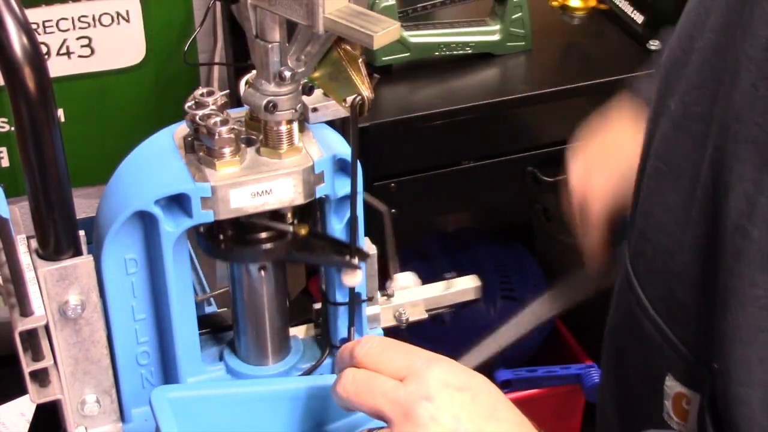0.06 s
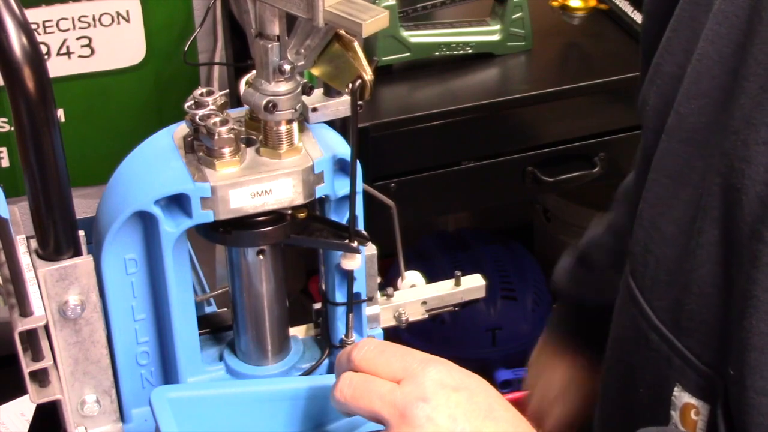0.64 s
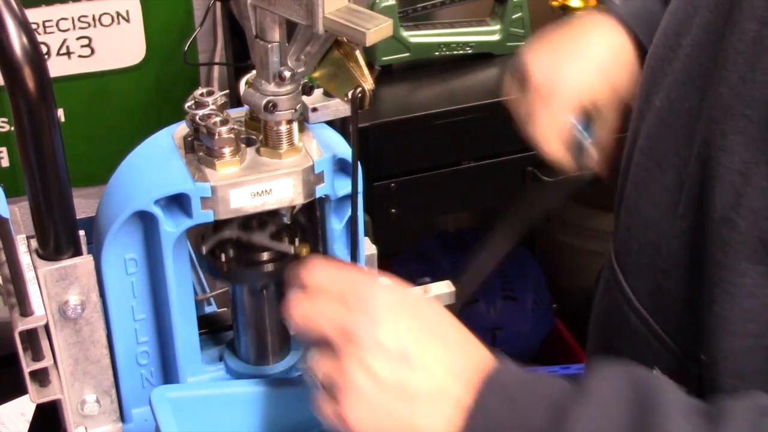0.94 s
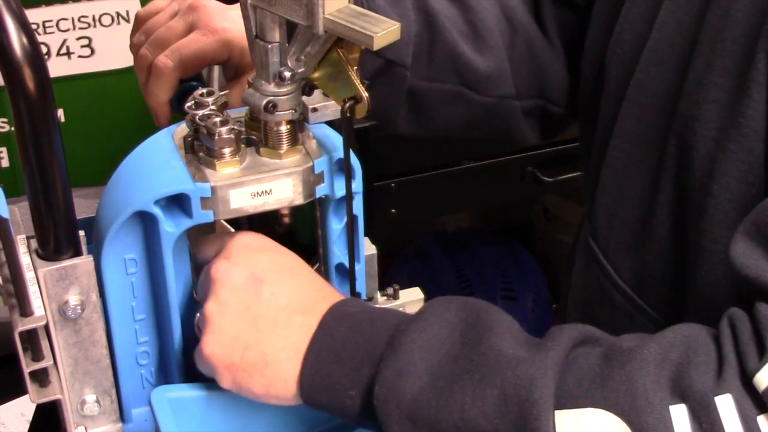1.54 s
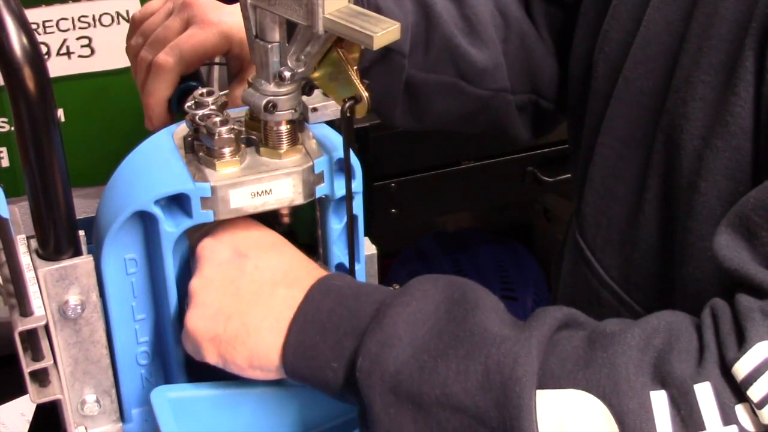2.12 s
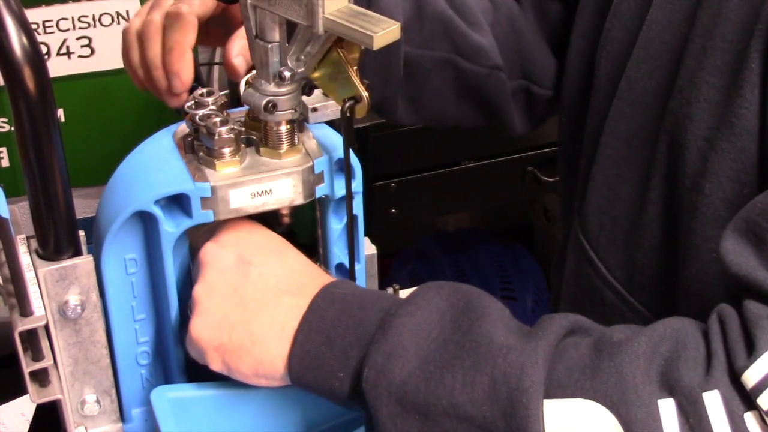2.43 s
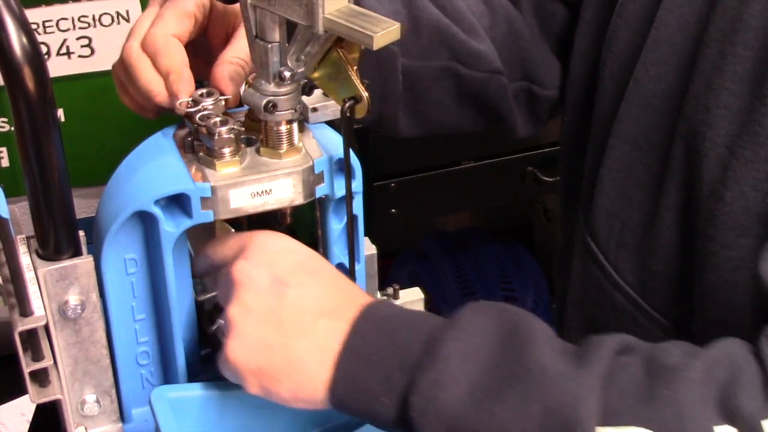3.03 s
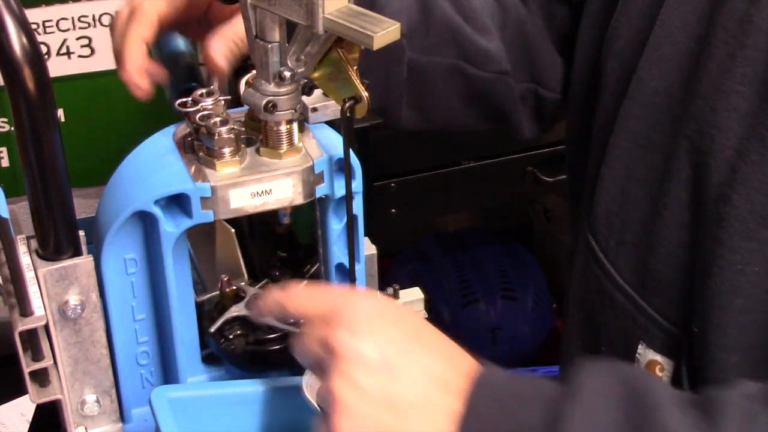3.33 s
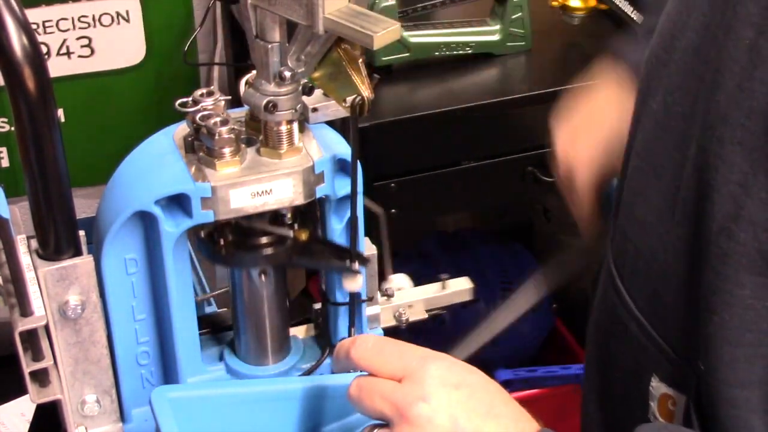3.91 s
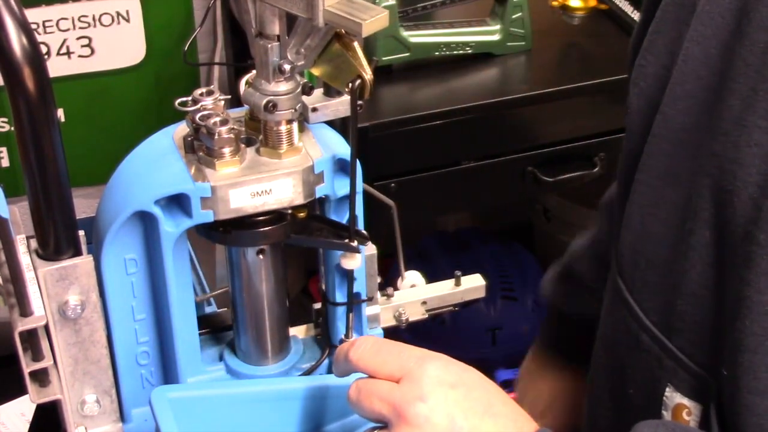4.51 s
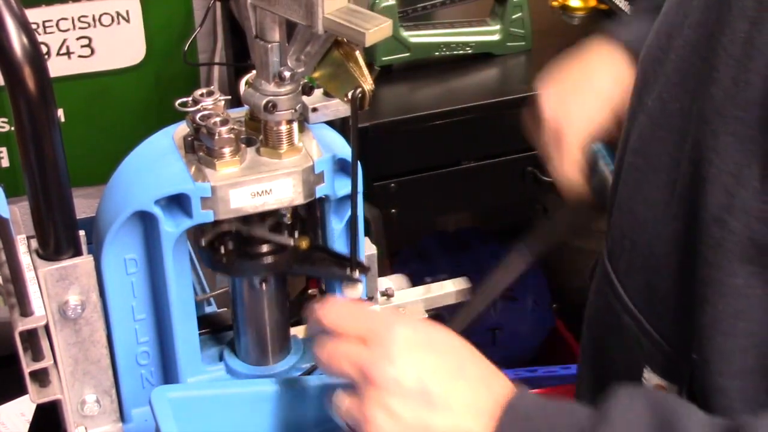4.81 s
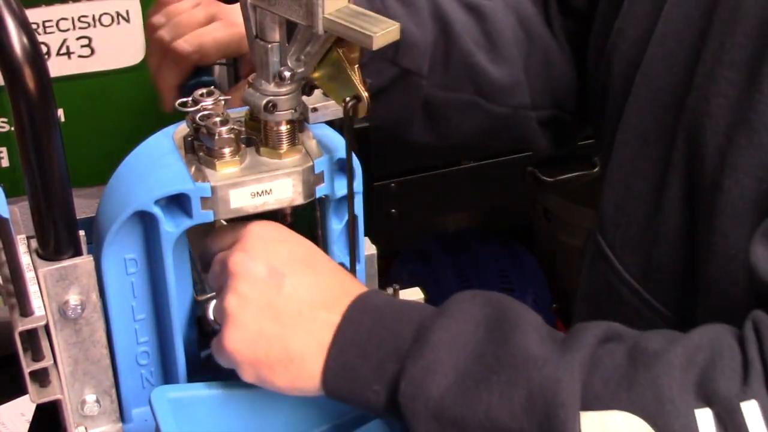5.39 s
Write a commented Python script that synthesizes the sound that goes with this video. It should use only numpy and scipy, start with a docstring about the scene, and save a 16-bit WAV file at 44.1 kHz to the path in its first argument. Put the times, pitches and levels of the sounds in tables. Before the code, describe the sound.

A manual reloading press is worked through two strokes on a workshop bench. Each begins with a brief judder and sharp metal clanks, then sliding scrapes and a quick run of clicks, clacks and chinking brass cases. Between the strokes comes a lull with faint pivot groans and a few light ticks. The sound is close and nearly centered, in a small quiet room with a short echo.

```python
"""Hand-worked reloading press, two strokes on a workshop bench, heard close.
Linkage and pawls knock and chatter; each blow rings the cast frame and thumps the bench.
A fitting judders; brass cases ping, chink and rattle. Sliding metal scrapes and squeals,
and a pivot groans softly by stick-slip. Small, quiet room with a short echo."""
import sys
import numpy as np
from scipy import signal
from scipy.fft import rfft, irfft
from scipy.io import wavfile
from scipy.ndimage import uniform_filter1d

SR = 44100
rng = np.random.default_rng(int(sys.argv[2]) if len(sys.argv) > 2 else 0)


def wrap_up_sound(samples):
    """Save the sound to the file named by the first command line argument, as 16-bit audio."""
    columns = np.atleast_2d(samples).T
    # keep every value between -1 and 1, then stretch to whole-number steps
    tamed = np.clip(columns, -1, 1)
    steps = np.round(tamed * 32767).astype(np.int16)
    wavfile.write(sys.argv[1], SR, steps)


N = 244755
RING_SAMPLES = 12288
TIME_S, AGE_S = np.arange(N) / SR, np.arange(RING_SAMPLES) / SR
FRAME_T60_S, STEEL_T60_S, PAWL_T60_S = .15, .18, .091

# Contact kinds (thump trim [dB], body trim [dB], tick trim [dB], chatter decay [s], pawl ring [dB])
THUD = (9, 6, -17, .0083, -24)  # handle at end of travel
BUMP = (5, 3, -7, .0086, -20)  # linkage slack taken up
CLANK = (-5, -1, -11, .009, -19)  # steel on frame
CLUNK = (-6, 7, -13.5, .007, -21)  # heavy part shifts
CLINK = (-18, -3.5, -8.5, .01, -13)  # case on die or guide
CLACK = (-21, -9, -8.5, .0052, -8)  # lever snaps over
TRIP = (-18, -7, -13.5, .0075, -1)  # pawl trips
DRAG = (-18, -6.5, -9, .0114, -12.5)  # lever scrapes over cam
TAP = (-17, -7.5, -16, .0088, -10)  # small part lands
TICK = (-21, -3, 1.5, .0065, -20)  # light, hard touch
NUDGE = (-4, 3.5, -24, .0069, -20)  # loaded linkage gives
# Contacts of both strokes: ram tops out, breaks free, levers trip, plate turns
# (time 1 [s], time 2 [s], level 1 [dB], level 2 [dB], part pitch [Hz], kind)
STROKE_CONTACTS = [ (0.1519, 4.0484, -12, -14, 1963, CLANK), (0.2197, 4.1031, -17.5, -15.5, 2000, CLANK),
                   (0.271, 4.1605, -36.5, -35, 1600, BUMP), (0.4057, 4.276, -27.5, -25, 2330, THUD),
                   (0.4368, 4.3048, -27, -30.5, 1680, BUMP), (0.6859, 4.5776, -29, -28, 1420, THUD),
                   (.7376, 4.6369, -27, -27.5, 2200, BUMP), (.758, 4.657, -28.5, -29, 2680, CLINK),
                   (0.7655, 4.6635, -20, -20, 1450, CLUNK), (0.8035, 4.7038, -18.5, -18.5, 1730, CLACK),
                   (.843, 4.747, -31, -31.5, 3700, TAP), (0.8745, 4.778, -31, -30.5, 3120, CLACK),
                   (.913, 4.817, -28.5, -27, 1040, DRAG), (.922, 4.8254, -23, -24, 1380, CLINK),
                   (.939, 4.843, -27.5, -28, 2630, DRAG), (0.9462, 4.8524, -19.5, -20, 2580, TRIP),
                   (1.0062, 4.9161, -26, -27, 2030, DRAG), (1.054, 4.9676, -25, -25.5, 3080, DRAG),
                   (1.065, 4.981, -14.5, -15.5, 1460, TRIP), (1.2719, 5.1973, -32, -31.5, 1650, CLUNK),
                   (1.3396, 5.2757, -29.5, -29, 5500, TICK), (1.3535, 5.2954, -27, -28.5, 3100, TAP),
                   (1.474, 5.4305, -36, -36, 1410, THUD), (1.5033, 5.4726, -40, -39.5, 1515, THUD)]
# One-off contacts: cases and linkage shift, hand sets a part (time [s], level [dB], pitch [Hz], kind)
STRAY_CONTACTS = [ (0.0124, -35.5, 4670, TICK), (0.0538, -25, 1860, CLACK), (0.614, -35.5, 1950, NUDGE),
                  (1.1651, -22.5, 3170, TAP), (1.3733, -28.5, 1574, TAP), (5.118, -35, 3400, DRAG),
                  (4.341, -34, 856, NUDGE), (4.3637, -37, 1470, DRAG), (4.417, -39, 942, NUDGE),
                  (4.5, -35, 1040, NUDGE), (4.533, -40.5, 1020, NUDGE), (4.564, -40, 2400, DRAG),
                  (2.1219, -35, 1030, CLINK), (2.17, -45.5, 3570, DRAG), (2.452, -39, 5970, TICK),
                  (2.6614, -41, 3050, TAP), (3.5424, -19, 3120, CLACK), (3.6002, -35.5, 3440, TICK),
                  (3.6935, -28.5, 1760, CLINK), (3.74, -33, 4340, TICK), (3.7493, -26.5, 2000, DRAG),
                  (3.77, -25, 2580, DRAG), (3.8002, -24, 1940, CLINK), (3.861, -38.5, 1840, TICK),
                  (3.913, -36.5, 4900, TICK), (3.959, -32.5, 1700, CLINK)]
# Cast frame on its bench (frequency [Hz], level [dB])
FRAME_MODES = [(146, -41.5), (212, -42), (340, -38.5), (378, -42), (455, -44.5), (506, -41), (662, -47),
               (790, -48.5), (870, -44.5), (1028, -43), (1130, -47), (1470, -47), (1690, -52),
               (1845, -46.5), (1981, -48.5)]
# Steel ram and dies (frequency [Hz], level [dB])
STEEL_MODES = [(2385, -36), (5141, -42.5), (10450, -57)]
# Indexing pawl and lever (frequency [Hz], level [dB])
PAWL_MODES = [(867, -4), (1690, -2), (1775, -0.5), (2570, -1), (2720, -3.5), (3070, -3), (4050, -6),
              (8700, -14)]
# Dense, short ring between the modes (frequency [Hz], density [dB])
CRACK_SPECTRUM = [(53, -60.5), (95, -28), (139, -4), (210, -3), (260, -18.5), (338, -0.5), (544, -10),
                  (1040, -7.5), (1270, -11.5), (2380, -12), (3290, -16), (10400, -27), (12500, -45),
                  (16000, -60)]
# Fitting judders near the top of each stroke (time [s], level [dB])
JUDDERS = [(0.1058, -25), (4.005, -25)]
# Fitting resonances (frequency [Hz], base width [Hz], level [dB])
FITTING_MODES = [(1910, 47, -6.5), (2420, 57, 1), (2940, 46, -2.5), (3320, 70, -8.5), (4290, 60, -10),
                 (5240, 76, -7), (5660, 70, -5), (7760, 69, -13), (8300, 63, -12), (11560, 50, -22),
                 (14550, 35, -24)]
# Small brass part struck (time [s], knock [dB], ping [dB])
PINGS = [(0.554, -32, -46), (3.456, -26, -32.5), (3.484, -30.5, -52), (4.448, -38, -62)]
# Its knock (frequency [Hz], density [dB])
KNOCK_SPECTRUM = [(71, -34), (120, -20), (260, -12.5), (484, 5), (682, -19.5), (1150, -13.5), (1630, -7),
                  (1760, -16.5), (5140, -10.5), (9430, -25.5), (11100, -36), (15000, -112)]
# Brass case against its guide (time [s], level [dB], pitch [Hz])
CHINKS = [(0.0121, -36.5, 13000), (.06, -40, 13500), (.152, -32, 14600), (.7422, -34.5, 8900),
          (.751, -41, 10000), (0.8028, -30, 10350), (0.8744, -43, 10400), (0.922, -36, 6750),
          (1.047, -42, 14400), (1.0598, -30.5, 10430), (1.066, -38, 14800), (1.1283, -43, 8000),
          (1.1403, -43, 10500), (1.185, -39, 8200), (1.2007, -40, 12800), (1.26, -37, 10500),
          (2.122, -46, 5200), (2.205, -51, 5600), (2.452, -45, 5910), (3.5422, -24, 5210),
          (3.5697, -39, 7660), (3.639, -37, 7400), (3.6929, -39, 10500), (3.762, -36.5, 8300),
          (3.9137, -36, 12900), (3.915, -35.5, 4600), (3.958, -41, 4630), (4.166, -43.5, 7700),
          (4.3656, -43.5, 7900), (4.6425, -33.5, 9320), (4.7035, -31.5, 10240), (4.7784, -46, 10400),
          (4.961, -44, 14400), (4.972, -29, 10450), (4.981, -40, 14800), (5.0433, -46, 11000),
          (5.07, -41.5, 10360), (5.1027, -40, 8000), (5.123, -36, 11000), (5.186, -38, 10320)]
# Dry metal squeals (time [s], length [s], level [dB], start pitch [Hz], end pitch [Hz], width [Hz])
SQUEALS = [(0.049, 0.023, -27.5, 2500, 3810, 600), (3.597, 0.054, -38, 4300, 5980, 1800),
           (3.745, .04, -32, 3800, 2590, 1500)]
# Ram and linkage travel, one list per stroke (time [s], rub [dB], scrape [dB])
SLIDE_CURVES = [
    [(0.0, -36.5, -39), (0.366, -43, -53), (0.68, -37.5, -47), (0.86, -37.5, -42.5), (1.108, -35.5, -35),
     (1.3, -37.5, -46), (1.45, -46.5, -53.5), (1.8, -67, -70)],
    [(3.5, -41, -51), (3.6, -39, -47), (3.72, -31.5, -37), (3.87, -38.5, -43), (4.1, -34, -39),
     (4.24, -44, -53), (4.55, -43.5, -53.5), (4.9, -37.5, -40), (5.08, -33.5, -37.5), (5.25, -41.5, -50.5),
     (5.55, -52.5, -61)],
]
# Sliding friction (frequency [Hz], density [dB])
RUB_SPECTRUM = [(65, -40), (110, -9.5), (483, 3.5), (1490, -7), (1790, -4.5), (2210, -24), (2670, -13.5),
                (3720, -16), (11000, -33), (16000, -30)]
# Linkage pivot, one list per groan (time [s], pitch [Hz], level [dB])
GROAN_CURVES = [
    [(1.19, 339, -37), (1.25, 490, -37.5), (1.3, 490, -47)],
    [(1.54, 360, -54), (1.602, 410, -46.5), (1.74, 450, -50.5), (1.87, 457, -61)],
    [(2.13, 372.5, -56), (2.18, 343, -52), (2.24, 347, -59)],
]
# Still room (frequency [Hz], density [dB])
AIR_SPECTRUM = [(15, -47), (25, -37), (64, -17.5), (97, -22), (141, -7), (195, -11), (277, -9), (301, -6.5),
                (531, -13), (575, -15), (1290, -19), (1840, -20), (2760, -24), (16000, -40.5)]


def blows(grit_db=5, after_t60_s=.32, part_t60_s=.06):
    """Bursts of tiny contacts ring frame and steel; heavy ones thump the bench, hard ones tick."""
    out = np.zeros(N)
    first = [(s, db, hz, kind) for s, _, db, _, hz, kind in STROKE_CONTACTS]
    second = [(s, db, hz, kind) for _, s, _, db, hz, kind in STROKE_CONTACTS]
    events = first + second + STRAY_CONTACTS
    heaviest_db = max(event[1] for event in events)
    crack = unit(np.pad(response(CRACK_SPECTRUM), (0, RING_SAMPLES))[:RING_SAMPLES])
    bodies = [(modes(FRAME_MODES, FRAME_T60_S), modes(PAWL_MODES, PAWL_T60_S)) for _ in range(10)]
    steel = modes(STEEL_MODES, STEEL_T60_S)
    for k, (at_s, db, hz, kind) in enumerate(events):
        thump_db, body_db, tick_db, chatter_s, pawl_db = kind
        frame, pawl = bodies[k % len(bodies)]
        contacts = noise() * undb(grit_db * noise()) * ragged(depth_db=3, rate_hz=400)
        rise_s = chatter_s ** 2 / .035  # loose blows build more slowly
        rise = (1 - np.exp(-AGE_S / rise_s)) ** 2
        clatter = undb(-16 + .22 * thump_db) * fade(after_t60_s)
        force = contacts * rise * (np.exp(-AGE_S / chatter_s) + clatter)
        steel_db = -9 + 1.6 * (db - heaviest_db)  # only heavy blows set the steel singing
        metal = undb(steel_db) * steel + undb(pawl_db) * pawl + undb(-8) * loose_part(hz, part_t60_s)
        driven = unit(through(force, crack + undb(-7) * frame))
        ring = driven + rise * (undb(-4) * frame + metal)
        snap = unit(band(force * np.exp(-AGE_S / (2 * chatter_s)), 2500, 10500, order=2))
        snap *= undb(-12 + .99 * tick_db)
        bands = [(band(ring, 132, 280, order=4), thump_db - 11.5),
                 (band(ring, 300, 1000), body_db - 9),
                 (band(ring, 1000, 2800), -9),
                 (band(ring, 2800, 5000), -16 - .22 * thump_db),  # heavier thump, softer edge
                 (band(ring + snap, 5000, 16000), tick_db - 9)]
        for part, part_db in bands:
            add(out, at_s - rise_s, undb(db + part_db) * unit_attack(part, .03))
    return out


def loose_part(hz, t60_s, overtone_db=-3):
    """Small struck part: own pitch plus inharmonic overtones that weaken upward."""
    overtones_hz = 1200 * 7 ** rng.random(7)
    levels_db = overtone_db - 20 * np.log10(np.maximum(overtones_hz / hz, 1))
    return modes([(hz, 0), *zip(overtones_hz, levels_db)], t60_s)


def judders(slips=4, gap_s=.0122, step_db=-1, damping=2.2):
    """Stick-slip in a fitting: each slip rings the same resonances and nudges the frame."""
    out = np.zeros(N)
    ring = np.zeros(RING_SAMPLES)
    for k, (hz, width_hz, db) in enumerate(FITTING_MODES):
        decay = np.exp(-np.pi * damping * width_hz * AGE_S)
        ring += (-1) ** k * undb(db) * width_hz * np.cos(2 * np.pi * hz * AGE_S) * decay
    for at_s, db in JUDDERS:
        for k in range(slips):
            force = noise() * fade(t60_s=.06)
            rasp = unit(band(force, 2400, 6000, order=2))
            frame = unit(band(modes(FRAME_MODES, FRAME_T60_S), 150, 800, order=1))
            slip = unit(through(force, ring)) + undb(-14) * rasp + undb(-5) * frame
            add(out, at_s + k * gap_s, undb(db + k * step_db) * unit_attack(slip, gap_s))
    return out


def pings(ping_hz=11080, width_hz=420):
    """A brass part knocks: low frame modes under a tight cluster of high brass modes."""
    out = np.zeros(N)
    for at_s, knock_db, ping_db in PINGS:
        force = noise() * fade(t60_s=.092)
        frame = unit(band(modes(FRAME_MODES, FRAME_T60_S), 290, 560, order=2))
        knock = unit(through(force, response(KNOCK_SPECTRUM))) + frame
        ping = unit(band(noise(), ping_hz - width_hz / 2, ping_hz + width_hz / 2)) * fade(t60_s=.095)
        add(out, at_s, undb(knock_db) * unit_attack(knock, .01) + undb(ping_db) * ping)
    return out


def chinks(gain_db=-2.5, overtone_db=-10):
    """Thin brass cases chatter; held by their guides, they ring only briefly."""
    out = np.zeros(N)
    for at_s, db, hz in CHINKS:
        overtones = [(overtone_hz, overtone_db) for overtone_hz in rng.uniform(3500, 12500, 10)]
        force = noise() * ragged(depth_db=5, rate_hz=500) * fade(t60_s=.055)
        ring = unit(through(force, modes([(hz, 0)] + overtones, t60_s=.034)))
        grit = unit(band(force, hz / 2, min(hz * 1.3, 15800)))
        add(out, at_s, undb(gain_db + db) * unit_attack(ring + undb(-2) * grit, .01))
    return out


def squeals():
    """Dry metal slides: a rough, gliding resonance swells and dies."""
    out = np.zeros(N)
    for at_s, length_s, db, start_hz, end_hz, width_hz in SQUEALS:
        progress = np.clip(AGE_S / length_s, 0, 1)
        phase = 2 * np.pi * np.cumsum(start_hz + (end_hz - start_hz) * progress) / SR
        slips = unit(band(noise(), 9.2, width_hz / 2, order=1))
        tone = slips * np.cos(phase) + slips[::-1] * np.sin(phase)
        swell = np.sqrt(4 * progress * (1 - progress))
        add(out, at_s, undb(db) * tone * swell)
    return out


def sliding(grain_db=8, uneven_db=3, split_hz=1700):
    """Dense metal-on-metal slips in uneven bursts, sounding through the frame."""
    out = np.zeros(N)
    slips = noise(N) * undb(grain_db * noise(N).clip(-3, 3) + uneven_db * walk(60))
    friction = unit(through(slips, response(RUB_SPECTRUM)))
    frame = unit(through(slips, modes(FRAME_MODES, FRAME_T60_S)))
    body = friction + undb(-6) * frame
    low, high = unit(band(body, 140, split_hz, order=2)), unit(band(body, split_hz, 9900))
    for stroke in SLIDE_CURVES:
        times_s, rub_db, scrape_db = np.transpose(stroke)
        moving = uniform_filter1d(1. * ((TIME_S >= times_s[0]) & (TIME_S <= times_s[-1])), size=600)
        rub = low * undb(np.interp(TIME_S, times_s, rub_db) - 2)
        scrape = high * undb(np.interp(TIME_S, times_s, scrape_db) - 4)
        out += moving * (rub + scrape)
    return out


def rattle(ticks_per_s=10, band_ratio=1.3):
    """Loose cases and springs of seven pitches tick on their guides at random as the ram moves."""
    out = np.zeros(N)
    tick = fade(t60_s=.026)[AGE_S < .04]
    for hz in np.geomspace(1500, 10000, 7):
        envelope = np.zeros(N)
        for stroke in SLIDE_CURVES:
            times_s, _, scrape_db = np.transpose(stroke)
            span_s = times_s[-1] - times_s[0]
            for progress, softness in rng.random((int(span_s * ticks_per_s), 2)):
                at_s = times_s[0] + progress * span_s
                offset_db = -2 - 2.5 * np.log(max(softness, .05))
                add(envelope, at_s, undb(np.interp(at_s, times_s, scrape_db) + offset_db) * tick)
        out += envelope * unit(band(noise(N), hz / band_ratio, hz * band_ratio, order=2)) / 2
    return out


def groans(gain_db=-2.5, suboctave_db=-8, flutter_db=2.5, edge_s=.017):
    """Stick-slip in a pivot; alternate slips differ, adding the octave below."""
    out = np.zeros(N)
    for curve in GROAN_CURVES:
        times_s, hz, db = np.transpose(curve)
        level_db = np.interp(TIME_S, times_s, db)
        jitter = np.clip(undb(level_db + 21), .04, .18) * walk(300)  # rougher under load
        phase = 2 * np.pi * np.cumsum(np.interp(TIME_S, times_s, hz) * (1 + jitter)) / SR
        gate = np.clip(np.minimum(TIME_S - times_s[0], times_s[-1] - TIME_S) / edge_s + .5, 0, 1)
        tone = np.sin(phase) + undb(suboctave_db) * np.sin(phase / 2)
        out += np.sqrt(2) * tone * gate * undb(level_db + gain_db + flutter_db * walk(70))
    return out


def bench_sway(press, t60_s=.7):
    """Heavy blows leave the bench rumbling."""
    power = band(press, 130, 300) ** 2
    decay = fade(t60_s) ** 2
    shake = np.sqrt(np.abs(through(power, decay / np.sum(decay))))
    return shake * unit(band(noise(N), 45, 85, order=2))


def room_echo(x, split_hz=1500, build_s=.015):
    """Short diffuse echo of a cluttered room; treble dies first."""
    scatter = noise()
    low = band(scatter, 33, split_hz, order=1) * fade(t60_s=.18)
    high = band(scatter, split_hz, 20000, order=1) * fade(t60_s=.079)
    tail = (low + 1.32 * high) * (1 - np.exp(-AGE_S / build_s))
    return through(x, unit(tail) / np.sqrt(RING_SAMPLES))


def still_room(air_db=-57, tick_db=-54, gap_s=.0664, tick_t60_s=.04):
    """Faint wavering room noise with a tiny regular ticking."""
    air = undb(air_db + .5 * walk(6)) * unit(through(noise(N), response(AIR_SPECTRUM)))
    ring = unit(band(noise(N), 1740, 2020, order=2))
    since_tick_s = (TIME_S - .057) % gap_s
    return air + undb(tick_db) * ring * np.exp(-np.log(1000) * since_tick_s / tick_t60_s)


def modes(table, t60_s):
    """Decaying partials, higher ones dying sooner; weights vary with the point of contact."""
    weights = undb(2 * noise(len(table))) * rng.choice([-1, 1], len(table))
    ring = np.zeros(RING_SAMPLES)
    for weight, (hz, db) in zip(weights, table):
        loss = (hz / table[0][0]) ** .25
        ring += weight * undb(db) * np.sqrt(loss) * np.sin(2 * np.pi * hz * AGE_S) * fade(t60_s / loss)
    return unit(ring)


def ragged(depth_db, rate_hz):
    """Gain of a contact that lands cleanly, then loses and regains touch."""
    knots = np.abs(noise(int(RING_SAMPLES / SR * rate_hz) + 2))
    knots[:2] = 0
    return undb(-depth_db * np.interp(AGE_S * rate_hz, np.arange(len(knots)), knots))


def walk(rate_hz):
    """Random wander, spread near one."""
    knots = noise(int(N / SR * rate_hz) + 2)
    return np.interp(TIME_S * rate_hz, np.arange(len(knots)), knots)


def response(spectrum, size=2048):
    """Minimum-phase impulse response of a spectrum."""
    hz, db = np.transpose(spectrum)
    gain = undb(np.interp(np.log(np.fft.rfftfreq(size, 1 / SR) + 1), np.log(hz), db))
    cepstrum = irfft(np.log(gain))
    cepstrum[1:size // 2] *= 2
    cepstrum[size // 2 + 1:] = 0
    return irfft(np.exp(rfft(cepstrum)))


def band(x, lo_hz, hi_hz, order=3):
    """Causal band-pass."""
    sos = signal.butter(order, [lo_hz, min(hi_hz, SR / 2 - 100)], "band", fs=SR, output="sos")
    return signal.sosfilt(sos, x)


def through(x, ring):
    """Convolve, keeping the length."""
    return signal.fftconvolve(x, ring)[:len(x)]


def noise(samples=RING_SAMPLES):
    """White Gaussian noise."""
    return rng.standard_normal(samples)


def fade(t60_s):
    """Exponential decay, 60 dB down at t60_s."""
    return np.exp(-np.log(1000) * AGE_S / t60_s)


def undb(db):
    """Decibels to gain."""
    return 10 ** (np.asarray(db) / 20)


def unit(x):
    """Scale to unit rms."""
    return x / np.sqrt(np.mean(x ** 2))


def unit_attack(x, attack_s):
    """Scale to unit deviation over the attack."""
    return x / np.std(x[AGE_S < attack_s])


def add(track, at_s, sound):
    """Mix a sound into a track."""
    start = max(int(at_s * SR), 0)
    track[start:start + len(sound)] += sound[:max(N - start, 0)]


def scene(room_db=-15, sway_db=-31):
    """Press almost straight ahead; a trace of echo and rumble gives width."""
    press = blows() + judders() + pings() + chinks() + squeals() + sliding() + rattle() + groans()
    mid = press + undb(room_db) * room_echo(press) + undb(sway_db) * bench_sway(press) + still_room()
    side = undb(-29) * room_echo(mid) + undb(-30) * mid + undb(sway_db - 12) * bench_sway(press)
    return np.array([mid + side, mid - side])


def record(dry):
    """Steep low-pass at 15.9 kHz."""
    return signal.sosfilt(signal.ellip(8, .2, 70, 15900, fs=SR, output="sos"), dry)


dry = scene()
out = record(dry)
wrap_up_sound(out)
```